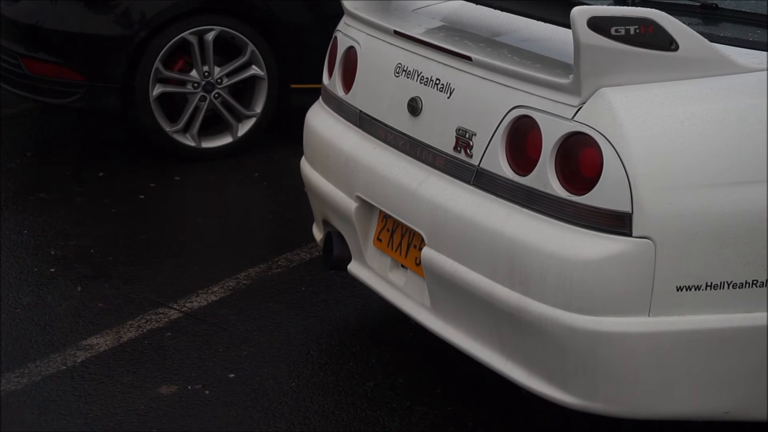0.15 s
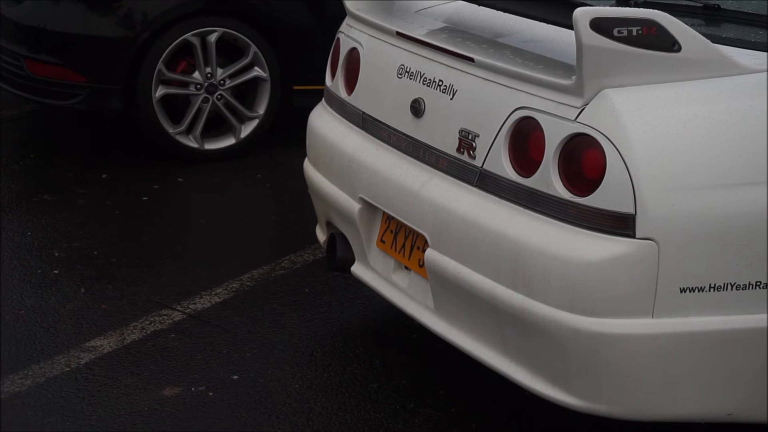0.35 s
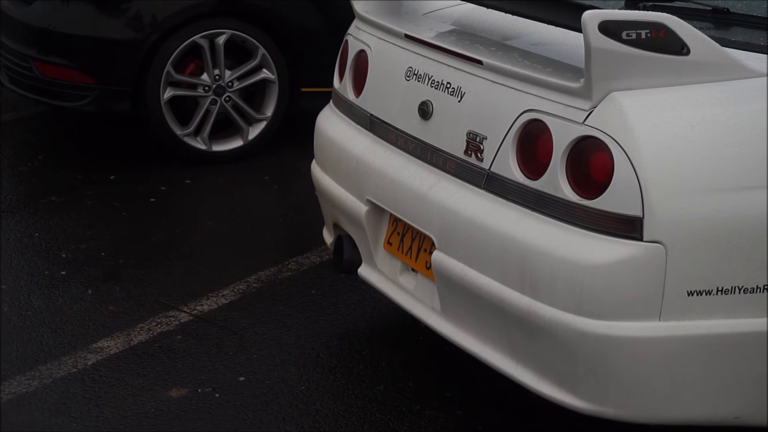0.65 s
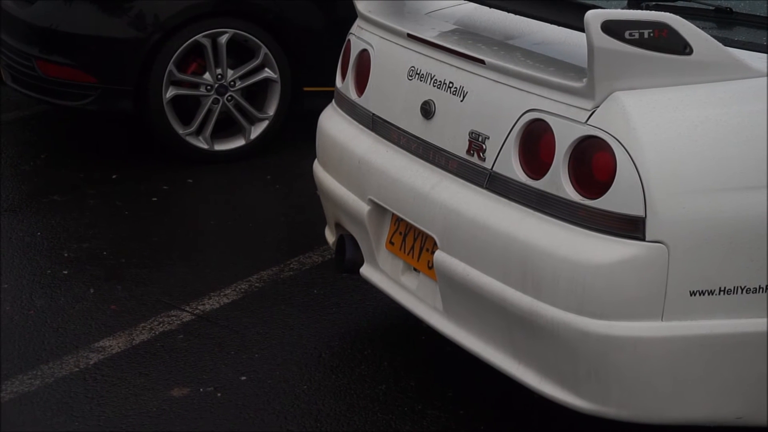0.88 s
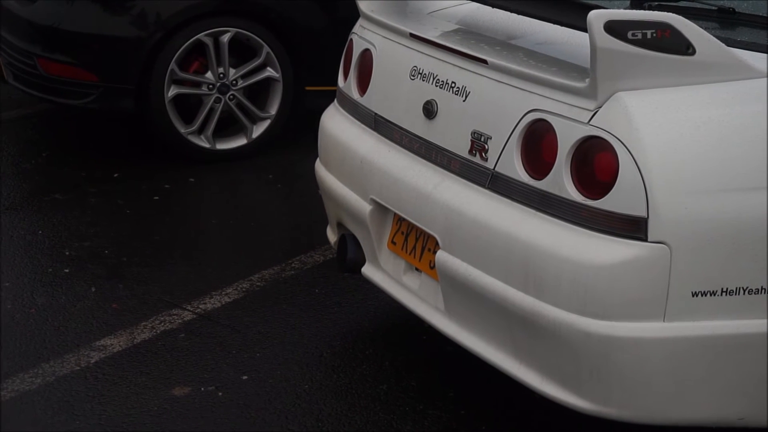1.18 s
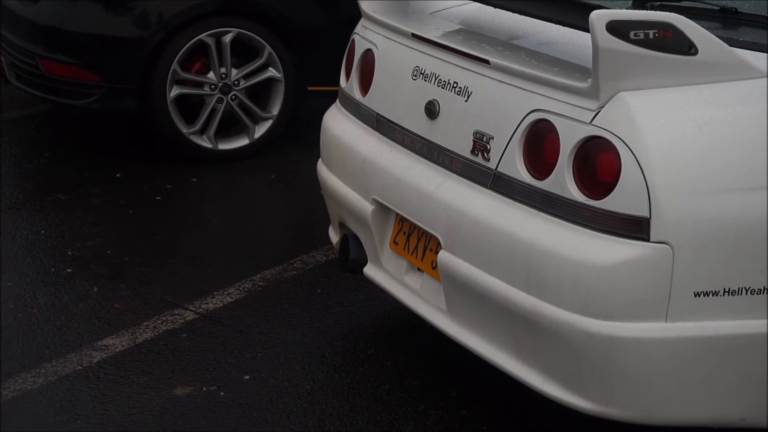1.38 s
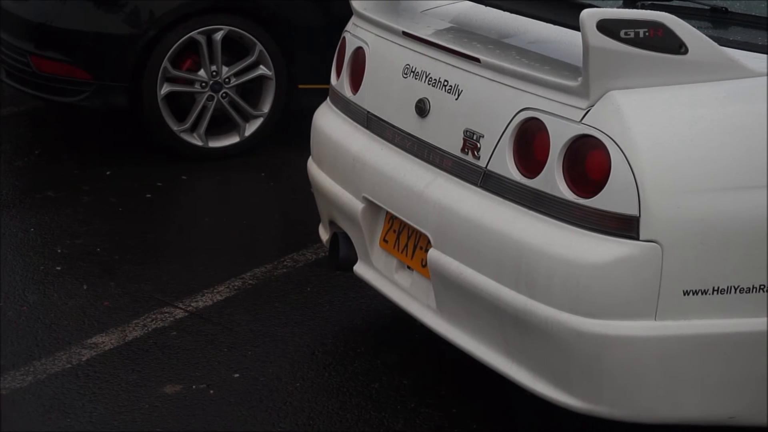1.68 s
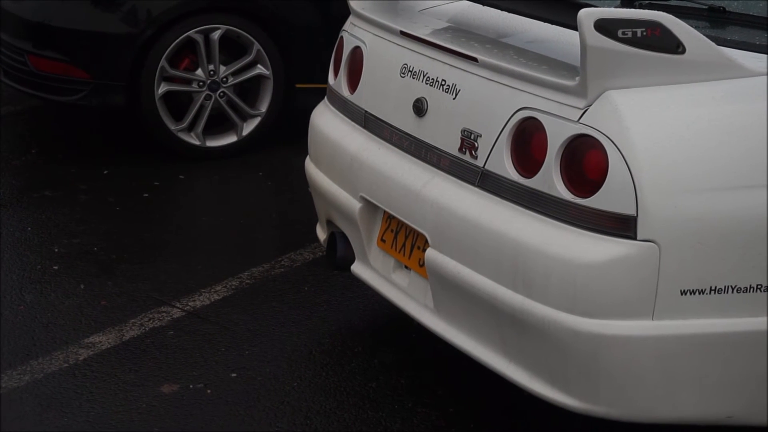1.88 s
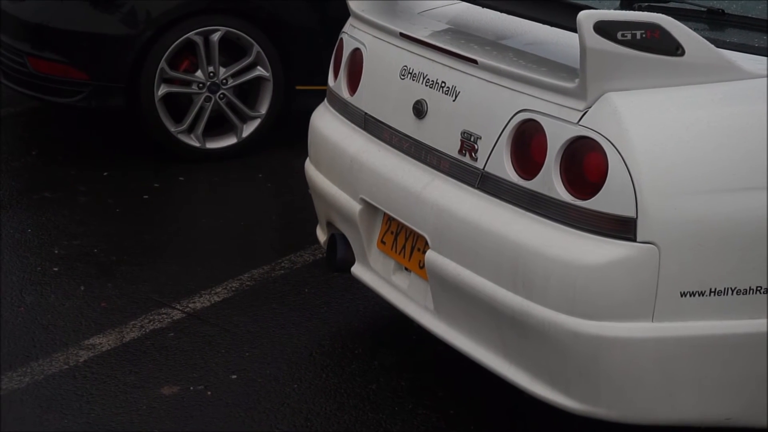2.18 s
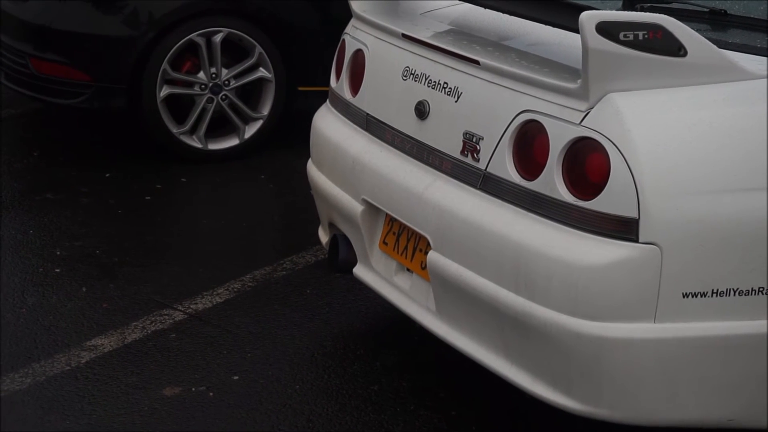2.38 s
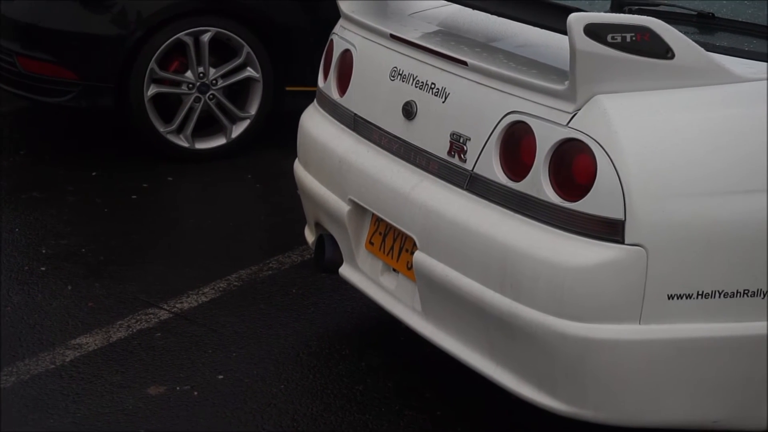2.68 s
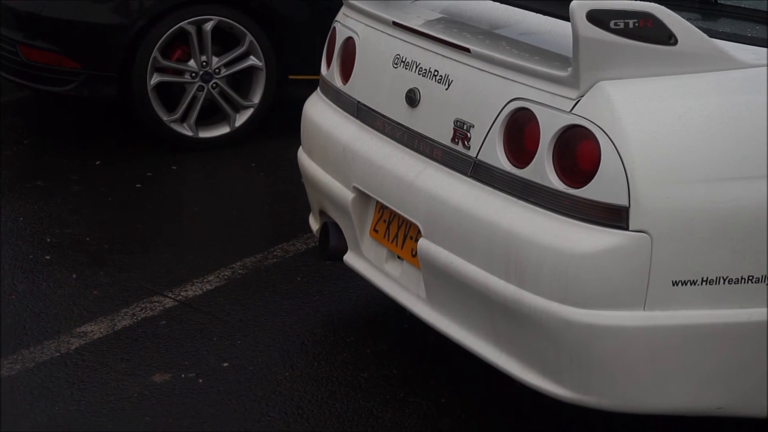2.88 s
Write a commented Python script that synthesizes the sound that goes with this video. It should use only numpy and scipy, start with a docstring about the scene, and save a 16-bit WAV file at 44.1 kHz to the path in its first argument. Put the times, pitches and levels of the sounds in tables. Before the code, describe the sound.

Sports car engine drops from a loud rev, burbles and pops, then settles to lumpy idle

```python
"""A six-cylinder sports car, heard from behind in a car park, comes off a rev; walls and cars answer faintly.
The exhaust is harmonics of a falling firing rate, with pulses and gated noise for the tailpipe's rasp.
A rush of filtered noise dies away; near the bottom uneven pops, filtered impulses, break out with cracks
and barks of noise. The firings settle into a lumpy idle over the engine bay's whirr of pulsing noise,
with short swells of hiss and one small tick."""
import sys
import numpy as np
from scipy import signal
from scipy.fft import rfft, irfft, next_fast_len
from scipy.io import wavfile
from scipy.ndimage import map_coordinates

SR = 44100
rng = np.random.default_rng(int(sys.argv[2]) if len(sys.argv) > 2 else 0)


def unload_audio(sound):
    """Save the sound as a 16-bit wav file, at the path given as the first command line argument."""
    columns = np.transpose(np.atleast_2d(sound))
    # keep every value between -1 and 1, then stretch to whole-number steps
    steps = np.round(np.clip(columns, -1, 1) * 32767)
    wavfile.write(sys.argv[1], SR, steps.astype(np.int16))


N = 134505
T = np.arange(N) / SR  # seconds

# Engine speed: (time [s], rate [firings per second])
FIRING_RATE = [(0, 272), (.2, 238.5), (.4, 210.3), (.55, 191), (.75, 167.6), (.95, 143), (1.15, 120.7),
               (1.32, 105.9), (1.55, 88), (1.75, 76.8), (2, 70.4), (2.25, 65.6), (2.65, 64.5), (3.05, 66.1)]
# Relative strength of each cylinder, in firing order: level [dB], scaled by the two UNEVEN shares
CYLINDER_DB = [-0.9, -1.5, 3.5, 1, 0, 2]

# Exhaust note: (time [s], 1st, 2nd and 3rd multiple of the firing rate [dB])
NOTE = [(0, -30, -39, -41), (.1, -33.5, -43, -53), (.22, -26.5, -33.5, -48), (.3, -28, -27.5, -31.5),
        (.38, -27, -17, -48), (.47, -43, -28.5, -29.5), (.53, -39, -23.5, -26.5), (.57, -27, -20.5, -20),
        (.66, -19.5, -50, -25.5), (.76, -22, -31, -28.5), (.84, -27, -39, -23), (.91, -24.5, -29, -29.5),
        (1.02, -27, -29.5, -45), (1.13, -35, -24, -42), (1.28, -54, -26, -45), (1.5, -51, -32, -51.5),
        (1.8, -62.5, -24.5, -35.5), (2.2, -69, -50, -60.5)]
# Overtones ringing out as the throttle shuts: (time [s], 4th, 5th, 6th and 7th multiple [dB])
OVERTONES = [(.24, -50, -48, -45, -58), (.39, -34, -37, -46, -52), (.47, -33, -34, -40, -46),
             (.55, -30, -28.5, -37, -31), (.61, -34, -47, -39, -38), (.68, -43, -45, -42, -43),
             (.79, -24, -47, -40, -46), (.87, -42, -42, -50, -47), (.98, -32, -50, -48, -50),
             (1.3, -50, -55, -58, -62)]
OVERTONE_FADE_DB_PER_S = 40  # after the last row

# Rasp of the tailpipe: (time [s], pulse level [dB], turbulence level [dB])
RASP = [(0, -36.5, -32), (.2, -33, -35), (.36, -29.5, -25.5), (.48, -25.5, -26.5), (.6, -29.5, -26),
        (.8, -30.5, -25.5), (1, -32, -27.5), (1.35, -36.5, -28), (1.5, -36.5, -34.5), (2.1, -50.5, -36),
        (3.05, -40, -34)]
# Resonances of the tailpipe: (frequency [Hz], level [dB])
RASP_COLOUR = [(60, -54), (170, -5), (330, -8), (440, 1), (570, 2.5), (650, -0.5), (715, -11.5),
               (810, -6.5), (890, -14), (1000, -7), (1350, -10), (1620, -13), (1850, -40), (2800, -37),
               (12000, -84)]
RASP_SCATTER_DB, RASP_UNEVEN, GATE_DEPTH = 1.2, .6, .7
GAS_FLUTTER_DB = 1.0

# Rush of air: (time [s], level [dB])
AIR = [(0, -38.5), (.25, -41), (.55, -46.5), (.8, -52), (1.3, -59.5), (1.8, -66), (3.05, -87.5)]
# Tone of the rush: (frequency [Hz], level [dB])
AIR_COLOUR = [(300, -7), (1500, -3), (2800, -1), (3800, -3.5), (5000, -5.5), (6500, -1.5), (7200, -11),
              (8800, -10), (10200, -5), (11500, -10.5), (13500, -11.5), (15600, -18)]
# Short swells of hiss at idle: (time [s], level [dB])
RUSTLES = [(2.045, -53), (2.226, -51.5), (2.362, -50), (2.55, -49)]
# Tone of the swells: (frequency [Hz], level [dB])
RUSTLE_COLOUR = [(1500, -10), (2900, 15.5), (4000, -3), (5800, 4), (7200, -7.5), (10500, -12.5),
                 (15000, -28)]
RUSTLE_S = .013  # standard deviation of a swell's bell shape

# Engine bay whirr: (time [s], level [dB])
BAY = [(0, -36.5), (.8, -39), (1.5, -43.5), (1.9, -45.5), (2.25, -44), (2.55, -41), (2.8, -41), (3.05, -38)]
# Tone of the whirr: (frequency [Hz], level [dB])
BAY_COLOUR = [(25, -41), (70, -13), (130, -7.5), (1500, 9.5), (2000, 2.5), (2900, 1.5), (3700, -9.5),
              (5800, -14.5), (7200, -28.5), (10500, -25), (13500, -40), (15600, -53)]
BAY_WAVER_DB = 1.1

# Hard firings as the engine catches: (time [s], relative strength [dB])
POPS = [(1.212, -15.5), (1.314, -12), (1.333, -13), (1.352, -10.5), (1.382, -16.5), (1.402, -11.5),
        (1.422, -12), (1.551, -11.5), (1.586, -9.5), (1.609, -8.5), (1.645, -10.5), (1.694, -9),
        (1.732, -9), (1.745, -8.5), (1.784, -10), (1.837, -8), (1.851, -11), (1.878, -10), (1.892, -9),
        (1.905, -9), (1.933, -12.5), (1.947, -8), (1.975, -14), (2.003, -13), (2.046, -9.5), (2.104, -13),
        (2.544, -9.5), (2.731, -7.5), (2.915, -7)]
# Ordinary firings, silent before the first row: (time [s], relative strength [dB])
IDLE = [(1.15, -30), (1.6, -16.5), (1.9, -25), (2.05, -13), (2.3, -11), (2.65, -9), (3.05, -9.5)]
# Firings that nearly fail, making the idle lope: time [s]
MISSES = [2.031, 2.09, 2.134, 2.163, 2.209, 2.269, 2.346, 2.392, 2.453, 2.53, 2.577, 2.639, 2.716, 2.824,
          2.9, 3.007]
MISS_DB, REBOUND_DB = -14, .5  # the firing after a miss is stronger
IDLE_UNEVEN, SCATTER_DB = .4, 1.3  # share of the cylinder differences, random spread
JITTER_S, LEAD_S = .00034, .00054  # spread from firing to firing; the valve opens early
# Tone of the pops and of dull idle firings: (frequency [Hz], level [dB])
POP_COLOUR = [(30, -14), (60, -17.5), (100, -11.5), (140, -4), (170, 6.5), (230, -1), (295, 0), (355, -17),
              (435, -9.5), (520, -26.5), (640, -25), (760, -39), (1300, -38), (1900, -53), (6000, -80.5)]
# Tone of bright idle firings: (frequency [Hz], level [dB])
IDLE_COLOUR = [(30, -27), (60, -31.5), (90, -8.5), (130, 1.5), (190, -3.5), (260, 2), (328, 5.5),
               (372, -21.5), (445, -5), (510, -20), (640, -28.5), (760, -45.5), (1300, -31.5), (1900, -61),
               (6000, -72.5)]
# Firings brighten as the idle steadies: (time [s], share of the idle colour [0 to 1])
BRIGHTEN = [(1.9, 0.22), (2.3, 0.16), (2.8, 0.86)]
# At idle the piston's push follows the first puff, then the pipe's echo
PUSH_S, PUSH_SHARE, ECHO_S, ECHO_SHARE = .0046, .5, .0092, .33
BOOM_HZ, BOOM_DECAY_S, BOOM_DB = 140.4, .032, -13  # ring of the silencer's cavity
SMEAR_HZ, SMEAR_WIDTH_HZ = 220.3, 43  # band held back by the silencer's chambers
CHUFF_DB, CHUFF_S = -20.5, .016  # gas that follows each firing: level, decay
# Tone of the chuff: (frequency [Hz], level [dB])
CHUFF_COLOUR = [(200, -11), (450, 16.5), (800, -1), (1350, 1.5), (1620, -11), (1900, -40.5), (3000, -26),
                (13000, -81.5)]

# Short, darker barks of gas from the tailpipe as the pops begin: (time [s], strength [dB])
BARKS = [(1.332, -17.5), (1.353, -22), (1.38, -19), (1.42, -22), (1.607, -21)]
# Tone of a bark: (frequency [Hz], level [dB])
BARK_COLOUR = [(200, -11), (420, 0), (660, -1), (800, -14), (1100, -15), (15000, -100)]
# Unburnt fuel cracking at the mouth of the pipe: (time [s], strength [dB])
CRACKS = [(1.3805, -26), (1.4355, -27), (1.499, -28), (1.5325, -29), (1.6435, -23.5), (1.662, -24),
          (1.71, -25), (1.7827, -23.5), (1.799, -26), (1.877, -23)]
# Tone of a crack: (frequency [Hz], level [dB])
CRACK_COLOUR = [(500, -22.5), (950, 0), (1350, 6), (1650, -5.5), (1900, -25), (15000, -75)]
BARK_DECAY_S, CRACK_DECAY_S = .008, .004

# Tone of the tick: (frequency [Hz], level [dB])
TICK_COLOUR = [(2000, -12), (6000, -1), (9500, 0), (13500, -1), (15600, -16)]
TICK_S, TICK_DB, TICK_DECAY_S = 2.728, -44, .004

# Placing of the exhaust: (frequency [Hz], left minus right [dB])
PIPE_PAN = [(150, -.1), (350, -.5), (700, -.7), (1400, -3), (3000, -5)]
# Placing of the rush and the swells: (frequency [Hz], left minus right [dB])
AIR_PAN = [(1000, 16), (3000, -8.5), (5500, -9.5), (7500, -1.5), (14000, 0.5)]
# Placing of the whirr: (frequency [Hz], left minus right [dB])
BAY_PAN = [(300, -16.5), (1200, -3), (2500, -7), (5000, -15), (7500, -7), (14000, 10)]
# Stereo width of the air, whirr and tick: (frequency [Hz], side level [dB])
TREBLE_WIDTH = [(5000, -1), (8000, 5), (12000, -5)]
AIR_ALIKE, BAY_ALIKE, RASP_ALIKE = .25, .049, .98  # correlation of left and right

# Tone of the car park's answer: (frequency [Hz], level [dB])
YARD_COLOUR = [(100, -22), (300, -10), (700, 0), (2000, 0), (15000, -1)]
# Width of the car park's answer: (frequency [Hz], side level [dB])
YARD_WIDTH = [(100, -40), (300, -14), (700, -6), (2000, 0)]
YARD_DB, YARD_T60_S = -7.5, .26
LOW_CUT_HZ, TOP_HZ = 40, 15650  # lower and upper limits of the sound


def amp(db):
    """Decibels to gain."""
    return 10 ** (np.asarray(db) / 20)


def unit(x):
    """Scale to rms 1."""
    return x / np.sqrt(np.mean(x ** 2) + 1e-20)


def curves(rows):
    """One value per sample for each column after the time."""
    s, *columns = np.transpose(rows)
    return [np.interp(T, s, column) for column in columns]


def along(points, hz):
    """Read (frequency, value) points on a log axis."""
    f, v = np.transpose(points)
    return np.interp(np.log(hz + 1), np.log(f + 1), v)


def coloured(x, points):
    """Filter causally (minimum phase, unit energy) to the given tone."""
    m = 2 * next_fast_len(N * 2 // 3)
    gain = unit(amp(along(points, np.fft.rfftfreq(m, 1 / SR))))
    cepstrum = irfft(np.log(gain + 1e-7))
    # Folding the cepstrum forward makes the filter causal
    cepstrum[1:m // 2] *= 2
    cepstrum[m // 2 + 1:] = 0
    return irfft(rfft(x, m) * np.exp(rfft(cepstrum)))[..., :N]


def panned(x, points):
    """Lean each frequency to the left or right."""
    m = next_fast_len(N + SR // 10)
    lean = along(points, np.fft.rfftfreq(m, 1 / SR)) / 2
    return irfft(rfft(x, m) * amp([lean, -lean]), m)[:, :N]


def noise(alike):
    """White stereo noise with the given correlation of the two sides."""
    turn = np.arccos(np.clip(alike, 0, 1)) / 2
    mid, side = rng.standard_normal((2, N))
    return np.cos(turn) * mid + np.sin(turn) * np.array([side, -side])


def wobble(rate):
    """A smooth random curve, rate knots a second."""
    knots = rng.standard_normal(int(N * rate / SR) + 4)
    return map_coordinates(knots, [T * rate])


def pulses(times, sizes):
    """Impulses placed between samples by a windowed sinc."""
    at = times[:, None] * SR
    taps = np.floor(at).astype(int) + np.arange(-7, 9)
    shape = np.sinc(taps - at) * np.sinc((taps - at) / 8)
    weights = (shape * sizes[:, None]).ravel()
    return np.bincount(np.clip(taps, 0, N).ravel(), weights, N + 1)[:N]


def note(cycles):
    """The clean multiples of the firing rate swell as they cross the pipe's resonances."""
    fade_db = OVERTONE_FADE_DB_PER_S * np.maximum(T - OVERTONES[-1][0], 0)
    levels = curves(NOTE) + [db - fade_db for db in curves(OVERTONES)]
    # The pipe spreads each pulse over its cycle
    phases = np.pi * np.arange(len(levels)) ** 2 / len(levels)
    tone = np.zeros(N)
    for k, db in enumerate(levels):
        tone += np.sqrt(2) * amp(db) * np.cos(2 * np.pi * (k + 1) * cycles + phases[k])
    return tone


def rasp(cycles, rate, times, cylinder_db):
    """Uneven firings growl between the note's lines; with gated turbulence they ring the tailpipe."""
    pulse_db, gas_db = curves(RASP)
    scatter_db = RASP_SCATTER_DB * rng.standard_normal(len(times))
    sizes = amp(RASP_UNEVEN * cylinder_db + scatter_db)
    # Removing the mean leaves only the differences between firings
    differences = pulses(times, unit(sizes - sizes.mean()))
    growl = differences * np.sqrt(SR / rate) * amp(pulse_db)
    gate = 1 + GATE_DEPTH * np.cos(2 * np.pi * cycles)
    gas = unit(noise(RASP_ALIKE) * gate) * amp(gas_db + GAS_FLUTTER_DB * wobble(90))
    return coloured(growl + gas, RASP_COLOUR)


def air():
    """Rushing air, as noise, fades as the revs fall; a few short swells of hiss follow at idle."""
    rush = coloured(amp(curves(AIR)[0]) * noise(AIR_ALIKE), AIR_COLOUR)
    swells = sum(amp(db) * np.exp(-.5 * ((T - s) / RUSTLE_S) ** 2) for s, db in RUSTLES)
    rustles = coloured(swells * noise(AIR_ALIKE), RUSTLE_COLOUR)
    return panned(rush + rustles, AIR_PAN)


def bay(cycles, depth=0.094):
    """Whirr of the engine bay, mostly off to the right, its noise pulsing with the firings."""
    level_db = curves(BAY)[0] + BAY_WAVER_DB * wobble(14)
    pulsing = 1 + depth * np.sin(2 * np.pi * cycles)
    return panned(coloured(noise(BAY_ALIKE) * amp(level_db) * pulsing, BAY_COLOUR), BAY_PAN)


def panels(x, ring_s=0.01, ring_db=-7):
    """Scatter among the body panels gives the air and whirr faint fixed resonances."""
    t = T[:SR // 8]
    tail = rng.standard_normal((2, len(t))) * np.exp(-t / ring_s)
    ring = signal.fftconvolve(x, tail / np.linalg.norm(tail[0]), axes=1)[:, :N]
    return x + amp(ring_db) * ring


def treble_width(x):
    """Scale left-right differences by frequency: wider around 8 kHz, narrower at the very top."""
    m = next_fast_len(N + SR // 10)
    width = amp(along(TREBLE_WIDTH, np.fft.rfftfreq(m, 1 / SR)))
    side = irfft(rfft((x[0] - x[1]) / 2, m) * width, m)[:N]
    return x.mean(0) + np.array([side, -side])


def yard(x):
    """A faint answer from the parked cars and walls, thin and narrow in the bass."""
    t = T[:SR // 2]
    decay = amp(-60 * t / YARD_T60_S) * (t > .005)  # nothing returns in the first 5 ms
    tails = rng.standard_normal((2, len(t))) * decay
    mid, side = (signal.fftconvolve(x.mean(0), tail / np.linalg.norm(tail))[:N] for tail in tails)
    side = coloured(side, YARD_WIDTH)
    return coloured(np.array([mid + side, mid - side]), YARD_COLOUR)


def boom(x):
    """The low decaying ring of the silencer's cavity."""
    t = T[:SR // 5]
    ring = np.sin(2 * np.pi * BOOM_HZ * t) * np.exp(-t / BOOM_DECAY_S)
    return amp(BOOM_DB) * signal.fftconvolve(x, ring)[:N]


def smeared(x):
    """The chambers delay part of each thump (an all-pass), rounding it without changing its colour."""
    r = np.exp(-np.pi * SMEAR_WIDTH_HZ / SR)
    poles = [1, -2 * r * np.cos(2 * np.pi * SMEAR_HZ / SR), r * r]
    return signal.lfilter(poles[::-1], poles, x)


def firing_strengths(times, cylinder_db, scatter_db):
    """Sort the firings into hard pops and an ordinary idle with misses and rebounds."""
    idle_db = np.interp(times, *np.transpose(IDLE)) + cylinder_db + scatter_db
    idle = amp(idle_db) * (times > IDLE[0][0])
    for s in MISSES:
        k = np.argmin(abs(times - s))
        idle[k:k + 2] *= amp([MISS_DB, REBOUND_DB])
    hard = np.zeros(len(times))
    for s, db in POPS:
        k = np.argmin(abs(times - s))
        hard[k], idle[k] = amp(db), 0
    return hard, idle


def firings(times, cylinder_db):
    """Each firing thumps the silencer and lets out a chuff of gas; some fire much harder."""
    chance = rng.standard_normal((len(times), 2))
    hard, idle = firing_strengths(times, cylinder_db, SCATTER_DB * chance[:, 0])
    at = times - LEAD_S + JITTER_S * chance[:, 1]
    pops, beats = pulses(at, hard), pulses(at, idle)
    push = PUSH_SHARE * pulses(at + PUSH_S, idle)
    echo = ECHO_SHARE * pulses(at + ECHO_S, idle)
    bright = np.clip(curves(BRIGHTEN)[0], 0, 1)
    dull = amp(23.5) * coloured(pops + (1 - bright) * beats, POP_COLOUR)
    full = amp(22.5) * smeared(coloured(bright * (beats + push + echo), IDLE_COLOUR))
    thumps = boom(pops + beats) - dull - full
    flow = signal.lfilter([1], [1, -np.exp(-1 / (CHUFF_S * SR))], pops + beats)
    chuffs = amp(CHUFF_DB) * coloured(flow * noise(RASP_ALIKE), CHUFF_COLOUR)
    return thumps + chuffs


def bursts(rows, decay_s, colour):
    """Sudden puffs of gas, as noise, that die away at once."""
    envelope = sum(amp(db) * (T > s) * np.exp(-abs(T - s) / decay_s) for s, db in rows)
    return coloured(envelope * noise(RASP_ALIKE), colour)


def tick():
    """A small bright tick: noise with a sudden start and a short decay."""
    envelope = amp(TICK_DB) * (T > TICK_S) * np.exp(-abs(T - TICK_S) / TICK_DECAY_S)
    return coloured(noise(AIR_ALIKE) * envelope, TICK_COLOUR)


def scene():
    """One crankshaft times the note, rasp, firings and whirr; the other sounds are placed around them."""
    rate, = curves(FIRING_RATE)
    cycles = np.cumsum(rate) / SR  # firings so far
    count = np.arange(1, int(cycles[-1]) + 1)
    times = np.interp(count, cycles, T)
    cylinder_db = np.take(CYLINDER_DB, count, mode="wrap")
    exhaust = note(cycles) + rasp(cycles, rate, times, cylinder_db)
    exhaust = exhaust + firings(times, IDLE_UNEVEN * cylinder_db)
    barks = bursts(BARKS, BARK_DECAY_S, BARK_COLOUR)
    cracks = bursts(CRACKS, CRACK_DECAY_S, CRACK_COLOUR)
    pipe = panned(exhaust + barks + cracks, PIPE_PAN)
    surroundings = treble_width(panels(air() + bay(cycles)) + tick())
    return pipe + amp(YARD_DB) * yard(pipe) + surroundings


def record(dry):
    """Roll off the deepest bass and stop sharply at TOP_HZ."""
    m = next_fast_len(N + SR // 10)
    hz = np.fft.rfftfreq(m, 1 / SR)
    response = (hz < TOP_HZ) * hz ** 2 / (hz ** 2 + LOW_CUT_HZ ** 2)
    return irfft(rfft(dry, m) * response, m)[:, :N]


dry = scene()
out = record(dry)
unload_audio(out)
```